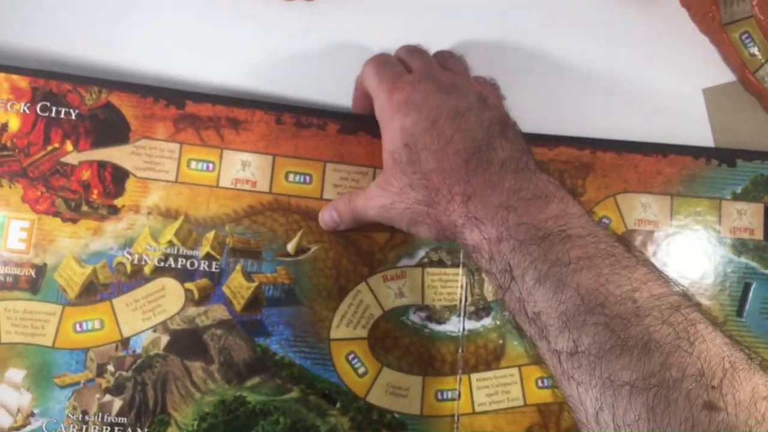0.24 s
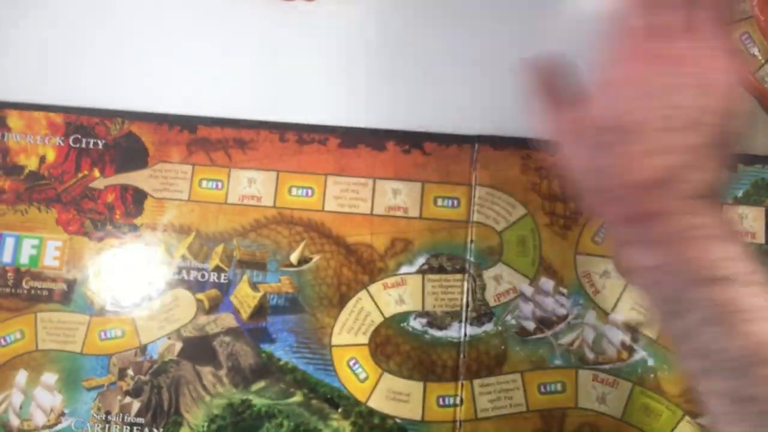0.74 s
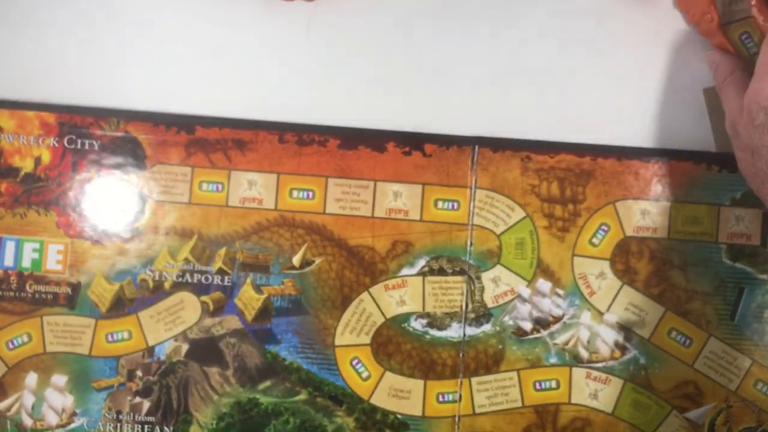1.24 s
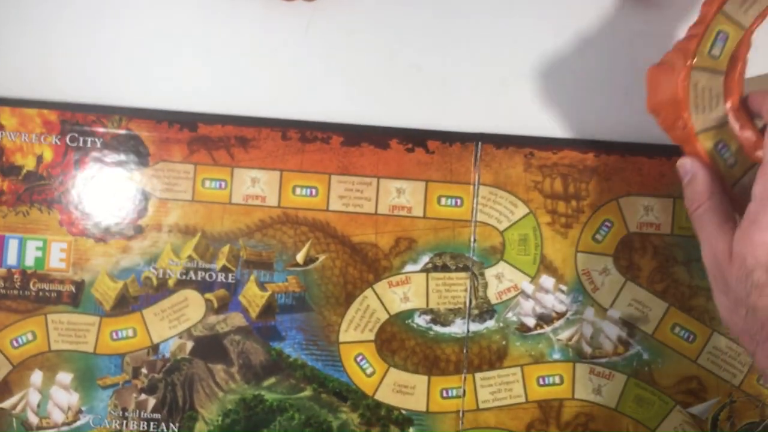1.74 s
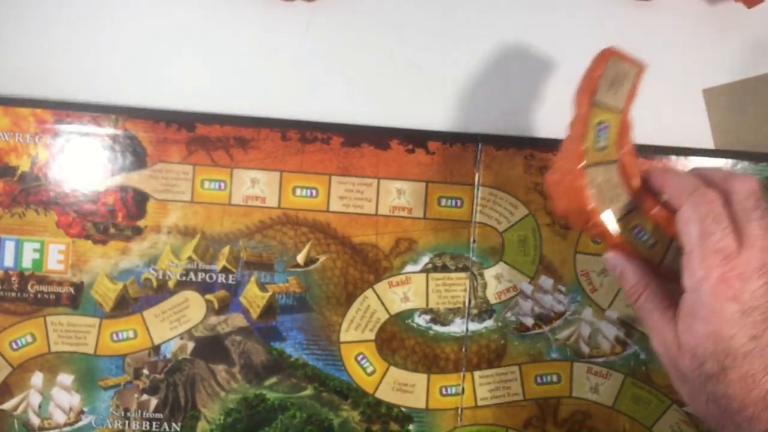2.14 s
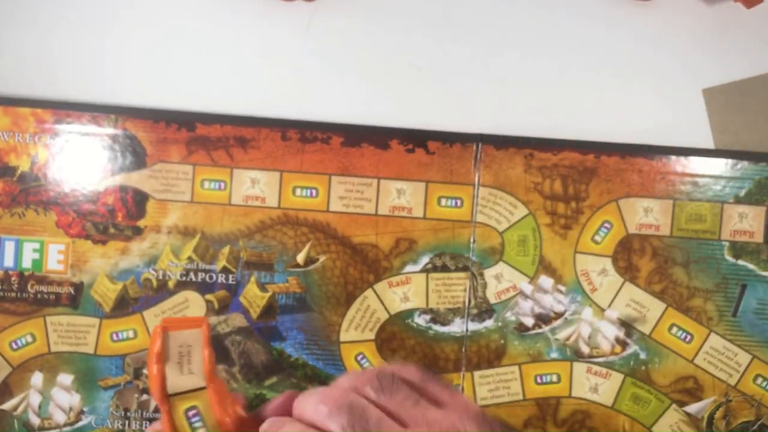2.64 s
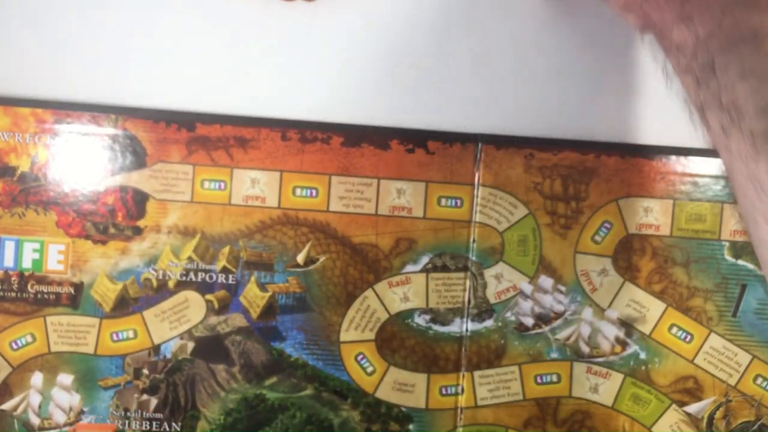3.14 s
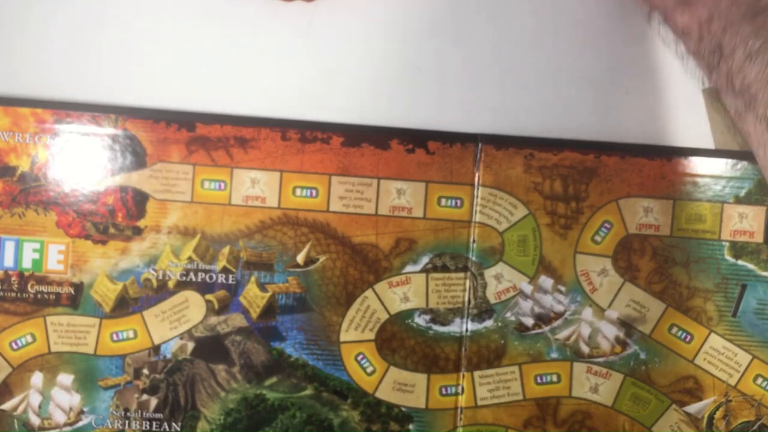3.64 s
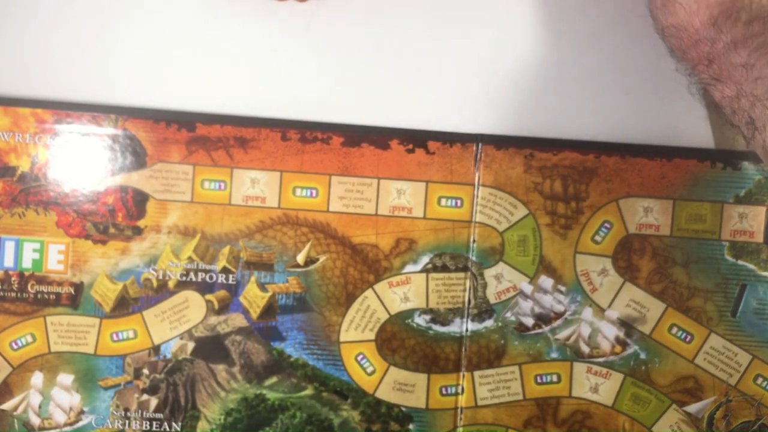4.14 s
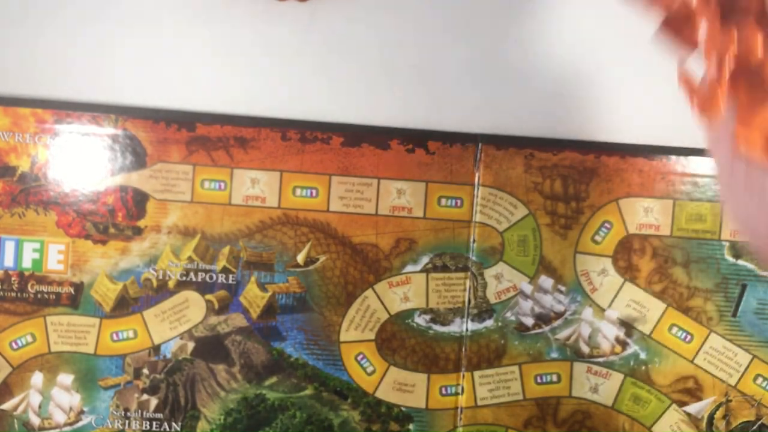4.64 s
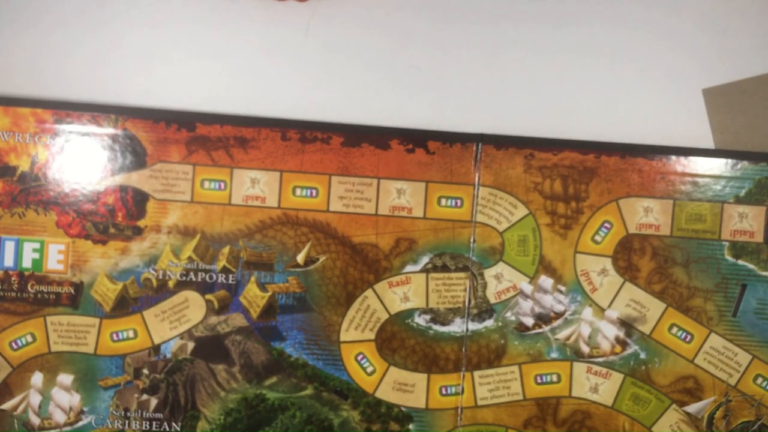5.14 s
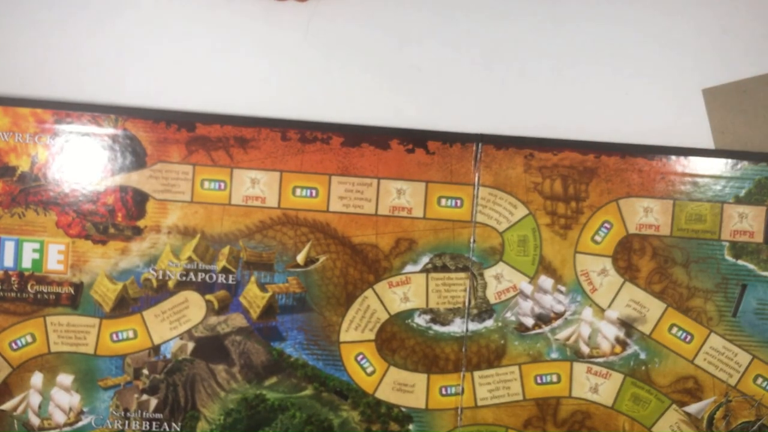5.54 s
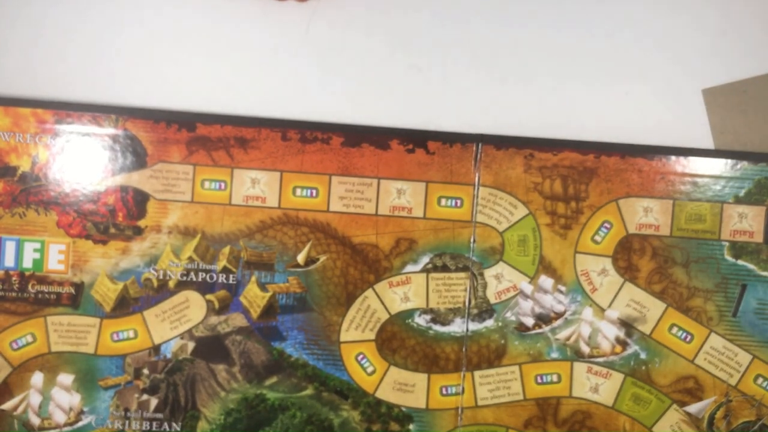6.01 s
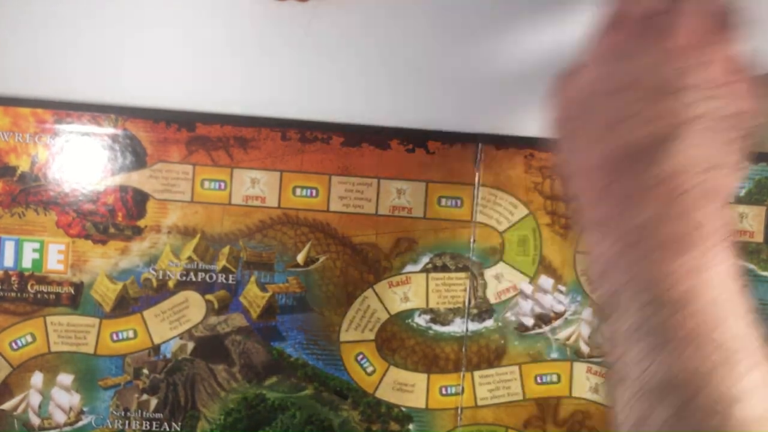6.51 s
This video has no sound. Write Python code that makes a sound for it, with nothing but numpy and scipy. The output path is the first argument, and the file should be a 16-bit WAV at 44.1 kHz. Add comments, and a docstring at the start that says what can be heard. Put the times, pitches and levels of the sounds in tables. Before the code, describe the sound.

A quiet room with low, slightly wavering ventilation rumble, faint hum and soft hiss; nothing else is heard until about 1.4 s. From 1.4 to 2.1 s a hand handles hollow plastic: small dry ticks, light rattles and short finger rubs, with a faint low bump near 2.0. Quiet again until 3.2 s, when a louder, tighter run of plastic clacks and rubbing peaks at 3.3-3.4, thins to faint ticks, then snaps brightly at 3.74. A strong, short, duller knock comes at 4.0, then a sharp bright clack at 4.3 and a lighter click at 4.4. After a pause, a piece lands farther away at 5.3 with a dull scuffing thump on the table. At 5.7-5.95 another lands with a brighter, gritty scrape, a low thud and brief hard ringing. A weak scuff at 6.1, then room tone, with a barely audible rub near 6.8.

```python
"""A quiet room: a hand picks hollow plastic pieces off a table, and they rub, rattle and clack together.
Then two pieces are put down further off with a dull scuff and a brighter scrape.
Contacts are noise bursts through plastic or table resonances; rubs are grainy noise; thuds are low sines.
The room answers with early reflections and a noise tail; ventilation rumbles, hums and hisses underneath."""
import sys
import numpy as np
from scipy import signal
from scipy.fft import rfft, irfft, next_fast_len
from scipy.io import wavfile
from scipy.ndimage import uniform_filter1d, map_coordinates

SR = 44100
rng = np.random.default_rng(int(sys.argv[2]) if len(sys.argv) > 2 else 0)


def to_wav(s):
    """Save 16-bit WAV."""
    ch = np.atleast_2d(s).T  # columns
    pcm = np.round(np.clip(ch, -1, 1) * 32767)  # PCM
    wavfile.write(sys.argv[1], SR, pcm.astype(np.int16))


N = 298557

# Random level drift of the low rumble, before its quicker waver: (time [s], level [dB])
RUMBLE_DRIFT = [(0.0, -38), (0.05, -45), (0.15, -53), (0.36, -49.5), (0.6, -57.5), (0.77, -45.5),
                (0.9, -54), (1.13, -46.5), (1.32, -61), (1.47, -51.5), (2.17, -51), (2.28, -56),
                (2.96, -49), (3.69, -53.5), (5.37, -46.5), (5.56, -53.5), (5.64, -48), (6.77, -50.5)]
# Resonance of the rumbling drone: (centre [Hz], width [Hz], relative level [dB])
DRONE_MODES = [(25.9, 9.6, 0)]
# Fuzzy fan hum: (centre [Hz], width [Hz], relative level [dB])
HUM_MODES = [(118.4, 5.3, 2.5), (65.3, 5.7, 4), (312, 27, -11.5), (1254, 5, -12.5), (1540, 11, -14),
             (1938, 130, -22.5)]
# Spectrum of the ventilation hiss: (frequency [Hz], relative level [dB])
AIR_COLOUR = [(28, -31), (48, -5.5), (76, -11), (91, -16.5), (102, -9), (121, -8), (207, -16.5), (307, -16),
              (578, -20), (669, -20.5), (1120, -22), (1960, -25), (2210, -28.5), (15200, -45), (16400, -46)]
# Contacts of plastic on plastic: (time [s], nominal peak [dB], low ring [Hz], high ring [Hz],
# high ring level [dB], brightness [dB per octave], chatter t60 [s])
CLACKS = [(1.372, -47, 1810, 3700, 6, -3, 0.025), (1.3818, -43, 1920, 4030, 6, -3, 0.031),
          (1.4535, -31, 1730, 3500, 10, 2.5, 0.046), (1.4884, -39.5, 1840, 6860, 8, 5.5, 0.05),
          (1.5312, -38, 3350, 4840, 6.5, 2, 0.054), (1.5423, -34, 1480, 3400, 2, -3.5, 0.03),
          (1.5593, -44, 1470, 5270, 5, 8, 0.042), (1.641, -38, 1900, 3900, 10, 0, 0.037),
          (1.6686, -40, 2100, 3840, 14, -2, 0.046), (1.8873, -42, 1670, 2700, 5, -6, 0.045),
          (1.9236, -38.5, 1660, 5900, 15, 0, 0.039), (1.9571, -33.5, 1630, 4380, 2, -12, 0.033),
          (1.975, -34.5, 3270, 6040, 18, 2.5, 0.077), (2.0144, -41.5, 2090, 6200, 12, -1, 0.039),
          (2.0469, -39, 1690, 5200, 8, 0, 0.046), (2.0567, -39, 1590, 4200, 8, 1, 0.033),
          (3.2148, -37.5, 1330, 4250, 1, -5.5, 0.027), (3.2629, -38.5, 1210, 7070, 6, 1.2, 0.027),
          (3.2742, -28.5, 1520, 6000, 2, 1.5, 0.034), (3.3074, -25.5, 1680, 4500, 2, -3.5, 0.043),
          (3.3328, -26.5, 2160, 6150, 12.5, 3.5, 0.034), (3.3671, -26, 1610, 5240, 2, -1, 0.052),
          (3.4069, -27, 2400, 4110, 3, 0.7, 0.039), (3.4586, -36, 1180, 5740, 10, 1.7, 0.04),
          (3.471, -45, 1110, 5800, 8, .6, .025), (3.486, -39.5, 2710, 5700, 9, -5, 0.024),
          (3.5377, -40, 1540, 4200, 7, 1, 0.023), (3.5932, -43, 1570, 4180, 0, -3.5, .025),
          (3.6176, -41.5, 2270, 4040, 3, -12, 0.013), (3.6475, -46, 1860, 3810, 6, -2, 0.026),
          (3.675, -32, 3030, 3980, 5.5, -.8, 0.021), (3.712, -34, 1890, 4470, 5, 4, 0.015),
          (3.739, -24, 4030, 8700, 5, 4.5, .018), (3.7508, -26, 4350, 9600, 7, 2, 0.03),
          (3.8513, -46.5, 2800, 4090, 3, -1.5, 0.022), (3.896, -45, 2120, 5360, 9, 2, 0.031),
          (4.004, -17, 1470, 2900, 6, -6, 0.015), (4.0107, -30, 1870, 3800, 0, -6, 0.044),
          (4.0163, -38.5, 2100, 4550, 7, -4, 0.13), (4.0446, -51, 2110, 4050, 5, 2, .028),
          (4.27, -41, 2700, 6090, -1, -3, 0.021), (4.2863, -41, 2480, 4400, 6, 1, .028),
          (4.2935, -17.5, 3050, 6640, 5, 3, 0.023), (4.2968, -22, 2600, 8840, 15.5, 6, 0.023),
          (4.309, -33.5, 2370, 5260, 7, -0.5, 0.062), (4.3907, -24.5, 1650, 8550, 7.5, 5, 0.018),
          (4.404, -38, 2660, 5630, 7, 3, .028)]
# Colour of an average contact: (frequency [Hz], relative level [dB])
CLACK_COLOUR = [(450, -23.5), (950, -15.5), (1800, -9), (3400, -11.5), (7000, -16), (12500, -28)]
# Resonances of the hollow plastic: (centre [Hz], width [Hz], relative level [dB])
PLASTIC_MODES = [(1100, 240, -2), (1610, 136, 4.5), (2100, 33, -5.5), (2385, 34, 0), (3270, 250, -16),
                 (4180, 57, 0), (5690, 110, -8), (6150, 410, -6.5), (6340, 90, -3.5), (8700, 350, -18),
                 (12700, 175, -3.5), (14100, 520, -4)]
# Sliding fingers and pieces, a row a stroke: (start of full pressure [s], hold [s], level [dB])
STROKES = [(1.387, .005, -55.5), (1.484, 0.044, -58.5), (1.549, 0.017, -53.5), (1.663, .008, -56),
           (1.895, 0.059, -63.5), (1.992, .012, -56), (2.054, 0.0045, -56), (3.29, 0.046, -47.5),
           (3.37, .003, -69), (3.412, 0.0028, -46.5), (3.498, .015, -63), (3.704, 0.0043, -54),
           (3.88, .015, -64), (6.76, .02, -62.5)]
# Colour given to the rubbing: (frequency [Hz], relative level [dB])
RUB_COLOUR = [(500, -43), (1000, -6), (1500, 2), (3000, 4.5), (6000, -2), (10000, -12.5), (16000, -24)]
# First reflections: (delay [s], level [dB])
WALLS = [(.0045, -45.5), (.011, -16.5), (0.0153, -23.5), (.022, -22.5)]
# Tail of the room: (frequency [Hz], t60 [s], relative level [dB])
ROOM_TAIL = [(200, 0.25, 11), (1000, 0.23, 3.5), (1520, 0.54, -3.5), (2100, 0.54, 4.5), (2900, 0.32, 2.5),
             (5000, 0.58, -2.5), (12100, 0.3, -1.5)]
# Low thuds and booms of the table top under the clacks and landings:
# (time [s], starting level of the sine [dB], pitch [Hz])
THUDS = [(1.962, -39, 254), (1.97, -42.5, 109.5), (3.275, -45.5, 223.5), (3.306, -49, 243),
         (3.366, -45.5, 246), (3.741, -43, 298), (4.002, -46, 153), (5.286, -40, 320), (5.298, -38, 116),
         (5.82, -38, 115)]
# Pieces landing and skidding further off: (time [s], nominal peak [dB], brightness [dB per octave],
# boom in the table [dB], t60 [s])
DROPS = [(5.2813, -24, -3, 0.5, 0.11), (5.292, -24, -3.5, 3, 0.044), (5.306, -29.5, -2.5, 13, 0.19),
         (5.327, -23, -1, -5, 0.19), (5.351, -28, 0.1, 5.5, 0.18), (5.371, -34, 1, -20, 0.11),
         (5.395, -33.5, -1.6, -14, 0.39), (5.425, -45, -4.5, -7, 0.38), (5.722, -32, -4.5, -9.5, 0.36),
         (5.732, -34.5, 4.2, 12, 0.26), (5.771, -25.5, -2, -1, 0.24), (5.806, -22, 6.5, 7, 0.23),
         (5.819, -23, 7.5, 26.5, 0.24), (5.83, -24.5, 1.1, 6.5, 0.34), (5.854, -29.5, 6.5, 12, 0.39),
         (5.889, -32.5, -3.5, -4, 0.19), (5.939, -36.5, -3.3, -8, 0.38), (6.125, -41.5, 4.5, 16, 0.26)]
# Colour of an average landing: (frequency [Hz], relative level [dB])
DROP_COLOUR = [(35, -46), (110, -41.5), (350, -43), (1100, -35.5), (3000, -46), (6500, -55), (12000, -70)]
# Table top resonances: (centre [Hz], width [Hz], relative level [dB])
TABLE_MODES = [(116, 14, 7), (332, 55, 11), (620, 58, -0.5)]
# Landings that set the second piece ringing: (time [s], level [dB])
RINGS = [(5.732, -64), (5.802, -60), (5.82, -52), (5.833, -51), (5.855, -59), (5.89, -59)]
# Modes of that piece: (nominal pitch [Hz], average relative level [dB], t60 [s])
DROP_RING = [(640, -2, .2), (940, -3, .3), (2379, 0, .3), (2690, 1, .18), (4410, 0, .4), (4540, -4, .36),
             (5230, 0, .45), (5310, -3, .35), (6020, -2, .1), (6400, -6, .25)]

STEADIED = 0.91  # 0 leaves the drone its own flutter, 1 removes it
WAVER_DB, WAVER_PER_S = 0.5, 3.3  # random waver of the rumble: depth, new values per second
TILT_HZ = 2500  # brightness tilts a colour around here
LOW_RING_DB, RING_T60_S = 7, 0.012  # lower struck ring; decay of both rings below DAMPING_HZ
DAMPING_HZ = 3500  # above this a struck ring dies faster in step with its pitch
CLACK_RISE_S, CLACK_CREST_DB = 0.00125, 11  # crest: nominal peak over the rms of the first 5 ms
BASS_EDGE, EDGE_DB_PER_OCTAVE = 0.99, 7.5  # bass falls away under this share of the low ring
SPOT_SHIFT, SPOT_DB = 0.03, 3  # spread of each plastic mode: pitch (as a share) and level
PRESS_DB_PER_S, LIFT_DB_PER_S = 520, 335  # how fast a stroke swells and fades
THUD_CYCLES = 9.2  # cycles a thud takes to die by 60 dB
DROP_RISE_S, DROP_LEAD_S = 0.0008, 0.002  # swell of the chatter; start ahead of the listed time
DROP_CREST_DB = 14  # nominal peak over the rms of the first 20 ms
BOOM_HZ = 430  # the boom lies under this
DULL_HZ, DULLING_DB_PER_S = 5000, 150  # over this a skid fades faster, by this much
RING_WANDER_HZ = 5  # line width of the fuzzy ringing modes
TOP_HZ = 16100  # around here the treble ends


def amp(db):
    """Gain of a level in dB."""
    return 10 ** (np.asarray(db) / 20)


def unit(x):
    """x at rms 1."""
    return x / np.sqrt(np.mean(x ** 2) + 1e-20)


def along(points, hz):
    """(Hz, value) points read on a log frequency axis."""
    f, v = np.transpose(points)
    return np.interp(np.log(hz + 1), np.log(f + 1), v)


def filtered(x, response):
    """x times a complex response of frequency."""
    m = next_fast_len(len(x) + 8192)  # spare room so the ringing does not wrap round
    return irfft(rfft(x, m) * response(np.fft.rfftfreq(m, 1 / SR)), m)[:len(x)]


def coloured(x, spectrum):
    """x shaped by a (Hz, dB) spectrum, at rms 1."""
    return unit(filtered(x, lambda hz: amp(along(spectrum, hz))))


def tilted(colour, tilt_db):
    """A (Hz, dB) spectrum made brighter by tilt_db per octave."""
    return [(hz, db + tilt_db * np.log2(hz / TILT_HZ)) for hz, db in colour]


def modes(rows):
    """Causal response of (Hz, width, dB) resonances, with alternating signs."""
    def response(f):
        total = 0
        for k, (centre, width, db) in enumerate(rows):
            resonance = 1j * f * width / (centre * centre - f * f + 1j * f * width)
            total = total + (-1) ** k * amp(db) * resonance
        return total
    return response


def grit(spiky_db, grain_s):
    """Friction noise: white noise whose size jumps from grain to grain."""
    grain = (np.arange(N) / (max(grain_s, 1e-4) * SR)).astype(int)
    catch = np.minimum(rng.exponential(size=N), 3)[grain]
    return unit(rng.standard_normal(N) * amp(spiky_db * catch))


def burst(noise, rise, t60, blow):
    """A contact force: one sharp blow, and chatter that rises and dies."""
    t = np.arange(len(noise)) / SR
    chatter = noise * amp(-60 * t / max(t60, .002)) * (1 - np.exp(-t / max(rise, 1e-4)))
    return chatter + blow * (np.arange(len(t)) == round(rise * SR))


def ventilation():
    """Filtered noise makes a wavering drone, a fuzzy hum and a broad hiss."""
    t = np.arange(N) / SR
    drone = filtered(filtered(rng.standard_normal(N), modes(DRONE_MODES)), modes(DRONE_MODES))
    # even out the drone's own flutter, so that the drift sets its level
    power = np.abs(uniform_filter1d(drone ** 2, SR // 12))
    drone /= np.sqrt(power + 1e-9) ** STEADIED
    waver_db = WAVER_DB * map_coordinates(rng.standard_normal(200), [t * WAVER_PER_S])
    drift_db = np.interp(t, *np.transpose(RUMBLE_DRIFT)) + waver_db
    hum = unit(filtered(rng.standard_normal(N), modes(HUM_MODES)))
    hiss = coloured(rng.standard_normal(N), AIR_COLOUR)
    return amp(drift_db) * unit(drone) + amp(-62.0) * hum + amp(-59) * hiss


def struck_ring(hz, db):
    """One resonance of the part that is hit: its width sets how fast it dies."""
    width = np.log(1000) / np.pi / RING_T60_S
    return hz, width * max(hz / DAMPING_HZ, 1), db


def clacks():
    """Each contact force rings the plastic, whose modes vary with the spot and the grip."""
    out, size = np.zeros(N + SR), SR // 5
    spots = rng.standard_normal((len(CLACKS), len(PLASTIC_MODES), 2)) * [SPOT_SHIFT, SPOT_DB]
    for (s, db, low_hz, high_hz, high_db, tilt_db, t60), spot in zip(CLACKS, spots):
        struck = modes([struck_ring(low_hz, LOW_RING_DB), struck_ring(high_hz, high_db)])
        ringing = modes([(hz * (1 + shift), width, level_db + more_db)
                         for (hz, width, level_db), (shift, more_db) in zip(PLASTIC_MODES, spot)])
        colour = tilted(CLACK_COLOUR, tilt_db)

        def response(f):
            octaves_under = np.maximum(np.log2(BASS_EDGE * low_hz / (f + 1)), 0)
            colour_db = along(colour, f) - EDGE_DB_PER_OCTAVE * octaves_under
            return amp(colour_db) * (.5 + ringing(f) + struck(f))

        force = burst(rng.standard_normal(size), CLACK_RISE_S, t60, blow=3.5)
        hit = filtered(force, response)
        onset_rms = np.sqrt(np.mean(hit[:SR // 200] ** 2))
        out[round(s * SR):][:size] += amp(db - CLACK_CREST_DB) * hit / onset_rms
    return out[:N]


def rubbing():
    """Sliding grains excite the same plastic resonances; each stroke swells, holds and fades."""
    ringing, t = modes(PLASTIC_MODES), np.arange(N) / SR
    grains = filtered(grit(spiky_db=3.5, grain_s=0.0023), lambda f: 0.29 + ringing(f))
    pressure = np.zeros(N)
    for s, hold, db in STROKES:
        press_db = PRESS_DB_PER_S * np.maximum(s - t, 0)
        lift_db = LIFT_DB_PER_S * np.maximum(t - s - hold, 0)
        pressure += amp(db - press_db - lift_db)
    return pressure * coloured(grains, RUB_COLOUR)


def room(x, wet_db):
    """First reflections, then a noise tail in which each frequency dies at its own speed."""
    out, step = np.zeros(N + 2 * SR), SR // 5
    centres, t60, level_db = np.transpose(ROOM_TAIL)
    for delay, db in WALLS:
        out[round(delay * SR):][:N] += amp(db) * x
    for start in range(0, N, step):  # a new tail every 0.2 s
        hz, t, z = signal.stft(rng.standard_normal(SR // 2), SR, nperseg=256)
        start_db = along([*zip(centres, level_db)], hz)[:, None]
        fade_db = start_db - 60 * t / along([*zip(centres, t60)], hz)[:, None]
        tail = signal.istft(z * amp(fade_db), SR, nperseg=256)[1]
        wet = signal.fftconvolve(x[start:start + step], tail / np.linalg.norm(tail))
        out[start + SR // 150:][:len(wet)] += amp(wet_db) * wet
    return out[:N]


def thuds():
    """The table top thuds and booms under the contacts: decaying sines, each with a puff of noise."""
    out, t = np.zeros(N + SR), np.arange(SR // 5) / SR
    for s, db, hz in THUDS:
        boom = np.sin(2 * np.pi * hz * t)
        puff = filtered(rng.standard_normal(len(t)), modes([(694, 570, 16.2)]))
        out[round(s * SR):][:len(t)] += amp(db - 60 * t * hz / THUD_CYCLES) * (boom + 0.42 * puff)
    return out[:N]


def drops():
    """Each landing is a gritty skid that booms in the table and soon loses its treble."""
    out, size = np.zeros(N + SR), SR // 3
    table = modes(TABLE_MODES)
    for s, db, tilt_db, boom_db, t60 in DROPS:
        colour = tilted(DROP_COLOUR, tilt_db)

        def response(f):
            low_boost_db = boom_db / (1 + (f / BOOM_HZ) ** 4)
            return amp(along(colour, f) + low_boost_db) * (1 + table(f))

        skid = burst(grit(spiky_db=0.5, grain_s=0.0014)[:size], DROP_RISE_S, t60, blow=1.2)
        hit = filtered(skid, response)
        dull = filtered(hit, lambda f: 1 / (1 + 1j * f / DULL_HZ))
        hit = dull + (hit - dull) * amp(-DULLING_DB_PER_S * np.arange(size) / SR)
        onset_rms = np.sqrt(np.mean(hit[:SR // 50] ** 2))
        out[round((s - DROP_LEAD_S) * SR):][:size] += amp(db - DROP_CREST_DB) * hit / onset_rms
    return out[:N]


def rings():
    """The harder piece rings on after landing, each mode at a new strength and slightly off pitch."""
    out, t = np.zeros(N + SR), np.arange(SR // 2) / SR
    for s, db in RINGS:
        for hz, level_db, t60 in DROP_RING:
            phase_step = np.sqrt(2 * np.pi * RING_WANDER_HZ / SR)
            wander = phase_step * np.cumsum(rng.standard_normal(len(t)))
            tone = np.sin(2 * np.pi * hz * (1 + rng.normal(0, 0.0048)) * t + wander)
            strength_db = db + level_db + rng.normal(0, 0.85)
            out[round(s * SR):][:len(t)] += amp(strength_db - 60 * t / t60) * tone
    return out[:N]


def scene():
    """The hand's sounds in the room, over the ventilation."""
    near = clacks() + rubbing() + thuds()
    far = drops() + rings()
    answer = room(near + amp(1.5) * far, wet_db=-13.0)  # the further pieces excite the room more
    return (near + far + answer + ventilation())[None]


def record(dry):
    """A steep treble roll-off around TOP_HZ, with silence above it."""
    def response(hz):
        slope_db = -45 * np.clip((hz - TOP_HZ + 300) / 700, 0, 1)
        return amp(slope_db) * (hz < TOP_HZ + 400)
    return filtered(dry[0], response)[None]


dry = scene()
out = record(dry)
to_wav(out)
```